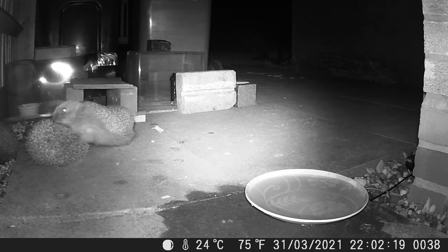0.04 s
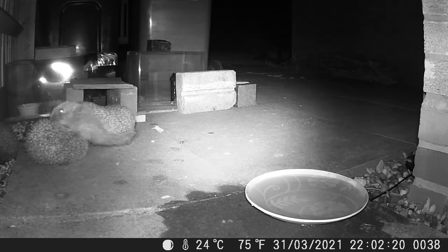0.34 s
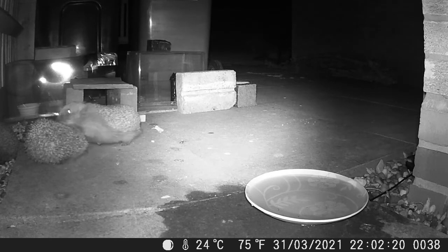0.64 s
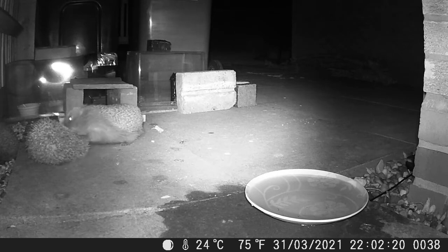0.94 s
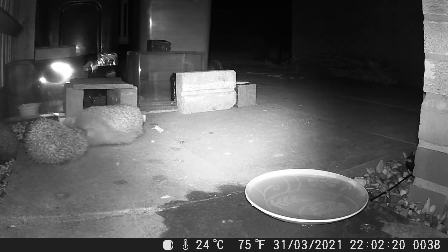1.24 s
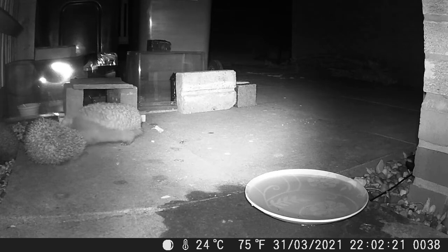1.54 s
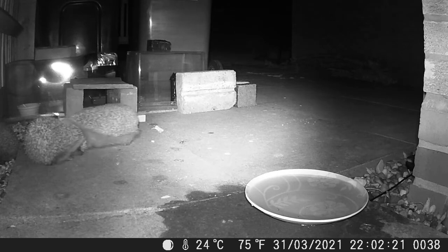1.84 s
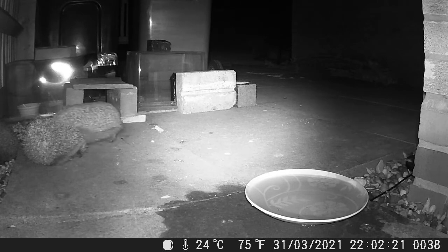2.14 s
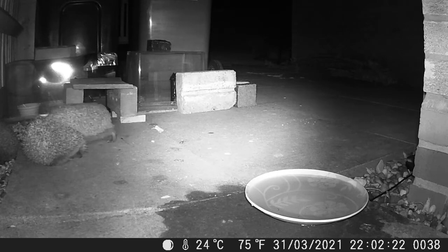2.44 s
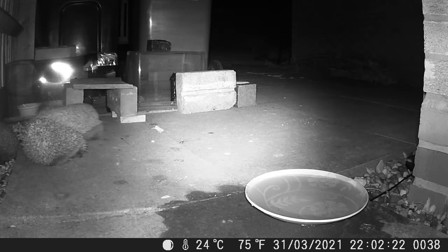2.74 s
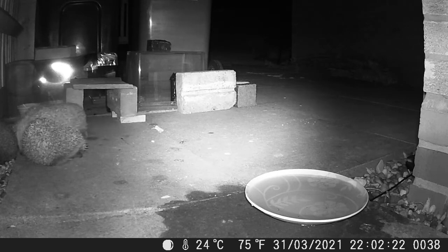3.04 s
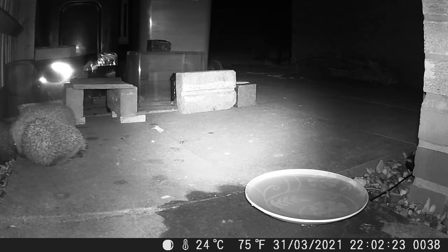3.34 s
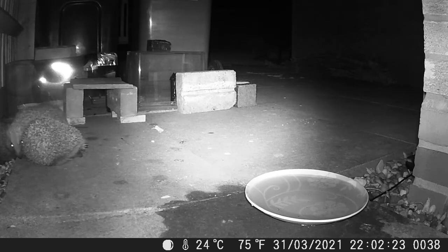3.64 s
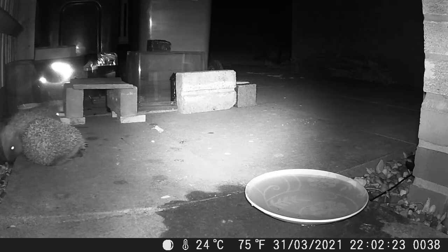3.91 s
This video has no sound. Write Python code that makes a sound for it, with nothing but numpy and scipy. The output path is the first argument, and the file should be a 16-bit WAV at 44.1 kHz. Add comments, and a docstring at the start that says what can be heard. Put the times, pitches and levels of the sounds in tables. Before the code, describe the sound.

Two hedgehogs sniff and huff faintly on a patio at night, with tiny dry ticks on the paving. The breaths come quickly, then thin out, over a low rumble, a wavering drone and hiss, a few metres from the microphone.

```python
"""Quick sniffs over a low rumble: two hedgehogs circle each other on a patio at night.
Short puffs of air ring in the nose of one, mixed with longer, fluttering huffs.
Dry ticks, likely claws and spines on the paving, fall among the breaths; both have a weak echo.
Behind them a hollow drone swells and fades, over a faint rustle and the soft hiss
of the night air and a trail camera a few metres away."""
import sys
import numpy as np
from scipy import signal
from scipy.fft import rfft, irfft
from scipy.io import wavfile
from scipy.ndimage import uniform_filter1d

SR = 44100
rng = np.random.default_rng(int(sys.argv[2]) if len(sys.argv) > 2 else 0)


def store_wav(level_fs):
    """Save 16-bit WAV to argv[1]."""
    pcm = np.round(np.clip(np.atleast_2d(level_fs), -1, 1) * 32767)
    wavfile.write(sys.argv[1], SR, pcm.T.astype(np.int16))


N = 176400
T = np.arange(N) / SR


# One row per sniff: peak t/s, relative level/dB, half length/s, open-nostril level/dB, pitch f/Hz
SNIFFS = [(0.172, -47, 0.0046, -10, 3500), (0.248, -48, 0.0035, -8, 3540), (.338, -43.5, 0.004, -1, 3470),
          (0.415, -42, 0.007, -2, 3480), (0.49, -42.5, 0.0048, 3, 3140), (0.5, -44, .003, 5, 3200),
          (.526, -51, 0.0047, 1, 3400), (0.586, -39, 0.0021, -6, 3170), (0.598, -47.5, 0.0094, 3, 3600),
          (0.648, -45, 0.0024, 3, 3120), (0.677, -38, 0.0023, -3, 3300), (0.697, -45, 0.0035, -12, 3550),
          (.81, -45, .0044, -8, 3020), (0.907, -40.5, 0.006, -16, 3300), (.92, -41.5, 0.0026, -15, 2950),
          (0.962, -42, 0.0046, -6, 3470), (.977, -41, 0.0059, 0, 2830), (.988, -37.5, 0.0033, -6, 3220),
          (1.014, -39, .0035, -9, 2820), (1.044, -32, 0.0047, -11, 3370), (1.143, -48, .005, 4, 3650),
          (1.34, -48, .004, -1, 3600), (1.416, -45.5, .006, 1, 3619), (1.455, -40, 0.005, -2, 3080),
          (1.685, -46, .006, -7, 2880), (1.723, -52, .004, -5, 3400), (1.778, -44, .005, -14, 3350),
          (1.844, -40.5, .0029, -10, 3470), (2.261, -40, 0.0047, -15, 3664),
          (2.287, -39, 0.0044, -18, 3509), (2.3, -37.5, 0.0039, -9, 3460),
          (2.787, -43.5, 0.0061, -10, 3350), (3.049, -47.5, 0.0038, -11, 3320),
          (3.784, -49, 0.0046, -10, 3550)]
# Where the nose rings in a sniff: multiple of the pitch, width/Hz, level/dB
SNIFF_NOSE = [(.86, 700, -7), (1, 380, 2), (1.09, 492, -10.5)]
# The lower rings of open nostrils: f/Hz, width/Hz, level/dB
SNIFF_OPEN = [(1290, 500, -8), (2030, 670, 4)]

def sniffs():
    """Each sniff is a tiny puff through the nose at its own pitch; wider nostrils add lower sound."""
    tail_db, tail_s = -13, 0.0068
    out = np.zeros(N)
    for peak, db, half, open_db, pitch in SNIFFS:
        near = np.abs(T - peak) < .08
        age = T[near] - peak
        rings = [(multiple * pitch, width, ring_db) for multiple, width, ring_db in SNIFF_NOSE]
        air = nose(rings, len(age)) + from_db(open_db) * nose(SNIFF_OPEN, len(age))
        puff = np.exp(-np.minimum((age / half) ** 2, 20))
        tail = (age > 0) * from_db(tail_db) * np.exp(-np.abs(age) / tail_s)
        out[near] += from_db(db - 7) * np.maximum(puff, tail) * air
    return out


# One row per huff: start t/s, rise/s, length/s, level/dB, relative open-nostril level/dB, swell/dB
HUFFS = [(0.612, 0.015, 0.085, -54.5, 5, 2), (0.929, 0.015, 0.12, -48, 1, 8),
         (1.401, 0.004, 0.073, -51.5, 6, -1), (1.637, 0.025, 0.16, -57, -5, 1.5),
         (2.201, 0.017, 0.095, -54, -1, 5), (2.744, 0.025, 0.042, -56.5, -6, 8),
         (3.732, 0.0091, 0.057, -54, -9, 1)]
# Where the nose rings in a huff: f/Hz, width/Hz, level/dB
HUFF_NOSE = [(2850, 700, -5.5), (3530, 460, 2)]
# The lower rings of open nostrils: f/Hz, width/Hz, level/dB
HUFF_OPEN = [(1110, 790, -0.5), (1900, 320, -5.5), (2470, 280, -1)]

def huffs():
    """A huff is a longer breath that usually swells, flutters in the nostrils and stops quickly."""
    release_s, flutter_db = 0.015, 2
    nasal, opened = nose(HUFF_NOSE), nose(HUFF_OPEN)
    out = 0
    for start, rise, length, db, open_db, swell_db in HUFFS:
        age = T - start
        flow = np.clip(age / rise, 0, 1) * np.exp(-np.maximum(age - length, 0) / release_s)
        push_db = swell_db * (np.clip(age / length, 0, 1) - 1)
        air = nasal + from_db(open_db - 6.5) * opened
        out += flow * from_db(db + push_db) * air
    return out * from_db(flutter_db * np.clip(drift(130), -2, 2))


# A faint, high fizz that the recorder adds to every breath: f/Hz, width/Hz, level/dB
RECORDER_FIZZ = [(5200, 850, -10.5), (6550, 430, -2)]

def nose(rings, size=N):
    """An even stream of air rings in the nose; the recorder adds a faint, high fizz."""
    air = cut_treble(ringing_noise(rings, size), hz=3880, order=8)
    loudness = np.sqrt(uniform_filter1d(air ** 2, size=260) + 1e-9)
    return air / loudness + from_db(-22) * ringing_noise(RECORDER_FIZZ, size)


# Dry ticks, likely claws and spines on paving: t/s, relative level/dB, body level against the top/dB
TICKS = [(.336, -38, -5), (.4115, -34, -1), (.488, -31.5, -4), (.524, -35.5, -2), (.5865, -29.5, -5),
         (.594, -38, 3), (.654, -30, 1), (0.677, -37, -5), (.697, -36, -8), (.987, -31, 1),
         (1.046, -39, -7), (1.1265, -40, 1), (1.2924, -31.5, -4), (1.4062, -33, 1.5), (1.414, -36, 4),
         (1.438, -36, -2), (1.4502, -27.5, -4), (1.841, -35, -8), (2.299, -42, 3), (3.046, -39, -8)]
# The lower body of a tick: f/Hz, width/Hz, level/dB
TICK_BODY = [(1200, 1300, -5), (2200, 662, 0.5)]
# The bright top of a tick: f/Hz, width/Hz, level/dB
TICK_TOP = [(3080, 450, -1), (3500, 560, -1)]

def ticks():
    """Each tick is one sharp touch and a tiny scrape that dies in a few milliseconds."""
    decay_s = 0.0021
    scrape = from_db(-22.5) * rng.standard_normal(N)
    top, body = 0, 0
    for start, db, body_db in TICKS:
        force = (T > start) * scrape * np.exp(-np.minimum(np.abs(T - start) / decay_s, 20))
        force[int(start * SR)] = 1  # the first touch
        top += from_db(db) * force
        body += from_db(db + body_db) * force
    ringing = struck(body, TICK_BODY) + struck(top, TICK_TOP)
    return from_db(23) * cut_treble(ringing, hz=4300, order=6)


def patio_echo(sound, delay_s=0.019, echo_db=-18):
    """The sound bounces off nearby boxes and a wall, adding one weak, quick echo."""
    return sound + from_db(echo_db) * np.interp(T - delay_s, T, sound, left=0)


# How the drone moves: t/s, level/dB, pitch f/Hz
DRONE_PATH = [(0, -59, 227.3), (0.171, -34, 226.3), (.25, -50, 219.8), (.35, -31, 216.7), (.46, -45, 220.3),
              (.58, -37.5, 228), (.68, -49, 224), (1.07, -35.5, 216.8), (1.14, -45, 220),
              (1.301, -33, 226.2), (1.42, -45, 225.2), (1.55, -32.5, 222.2), (1.691, -54, 225),
              (2.02, -49, 227.7), (2.17, -37, 225.7), (2.46, -35, 225.7), (2.59, -28.5, 227.4),
              (2.7, -45.5, 229.2), (2.8, -48, 228.1), (2.88, -36, 226.9), (3.03, -32, 224), (3.2, -50, 222),
              (3.35, -41.5, 227), (3.45, -32.5, 229), (3.521, -43, 228.9), (3.58, -32, 231),
              (3.68, -42, 226.8), (3.87, -39, 223), (4, -56, 227)]
# A hollow rush that swells with it: f/Hz, width/Hz, level/dB
DRONE_RUSH = [(189.5, 21, 1.5), (293, 12, -11), (345, 50, -10.5)]

def drone():
    """A hollow, wavering tone swells, fades and wanders a little in pitch."""
    times, db, hz = np.transpose(DRONE_PATH)
    base_hz, width_hz = 229.7, 10.5
    tone = signal.hilbert(ringing_noise([(base_hz, width_hz, 0)]))
    evened = tone / (np.abs(tone) + 0.089)  # irons out most of the random swings in loudness
    bend = np.exp(2j * np.pi * np.cumsum(np.interp(T, times, hz) - base_hz) / SR)
    hum = rms_one((evened * bend).real)  # the tone, slid to the pitch in the table
    rush = from_db(-7.5) * ringing_noise(DRONE_RUSH)
    return (hum + rush) * from_db(np.interp(T, times, db))


# How loud the rustle is: t/s, level/dB
RUSTLE_LEVEL = [(0, -52.5), (.85, -55.5), (1.0, -53), (1.15, -56.5), (1.38, -54), (1.43, -53), (1.52, -54),
                (1.95, -55), (2.25, -52), (2.6, -54), (3.2, -54), (3.37, -50), (3.48, -63), (3.9, -52)]
# The pitches it gathers around: f/Hz, width/Hz, level/dB
RUSTLE_BANDS = [(670, 420, 1), (1078, 410, 1.5), (1830, 660, -5.5)]

def rustle():
    """A faint rustle, neither deep nor high, comes and goes under the hiss."""
    times, db = np.transpose(RUSTLE_LEVEL)
    return from_db(np.interp(T, times, db)) * ringing_noise(RUSTLE_BANDS)


# The rumble's strength from low to high: f/Hz, relative level/dB
RUMBLE_SHAPE = [(12, -3.5), (27, 4.5), (38, 0.5), (55, 1.5), (78, -2), (108, -3), (130, -3), (165, -16.5),
                (205, -15), (270, -17), (345, -15), (400, -23.5), (600, -72)]
# Hollow rings in the rumble: f/Hz, width/Hz, level/dB
HOLLOW_RINGS = [(48.6, 12.4, 5.5), (114.9, 24.7, -0.5), (151.7, 8.1, 0.5), (189.7, 21.7, -1),
                (216.7, 18.2, -1), (253.9, 8.1, -4.5), (290.8, 8.3, -4.5)]

def rumble():
    """Deep, steady noise with a few hollow rings in it."""
    return from_db(-32) * shaped_noise(RUMBLE_SHAPE) + from_db(-35) * ringing_noise(HOLLOW_RINGS)


# The hiss's strength from low to high: f/Hz, relative level/dB
HISS_SHAPE = [(150, -0.5), (450, 2.5), (750, -2), (1200, -6.5), (2000, -10.5), (2800, -14.5), (3400, -17.5),
              (3750, -18.5), (4100, -27), (4600, -30.5), (5200, -32), (6000, -26.5), (6700, -23),
              (7150, -25.5), (7600, -42), (9000, -41.5), (10200, -50.5), (11200, -68)]

def hiss():
    """The night air and the camera make a smooth hiss that wavers very slightly."""
    return from_db(-44.5 + 0.5 * drift(2.3)) * shaped_noise(HISS_SHAPE)


def from_db(db):
    """Turn decibels into a number to multiply a sound by."""
    return 10 ** (np.asarray(db) / 20)


def rms_one(sound):
    """Scale a sound so that its average strength (rms) is 1."""
    return sound / np.sqrt(np.mean(sound ** 2) + 1e-20)


def drift(rate_hz):
    """A smooth random wobble of strength 1; a higher rate wobbles faster."""
    step, warm_up = 40, 2000
    r = np.exp(-2 * np.pi * step * rate_hz / SR)
    noise = rng.standard_normal(N // step + warm_up + 2)
    slow = signal.lfilter([1], [1, -2 * r, r * r], noise)[warm_up:]
    return np.interp(np.arange(N) / step, np.arange(len(slow)), rms_one(slow))


def shaped_noise(shape):
    """Steady noise of strength 1 with the given balance of low and high."""
    hz, db = np.transpose(shape)
    f = np.maximum(np.arange(N // 2 + 1) * SR / N, 1)
    gain = from_db(np.interp(np.log(f), np.log(hz), db))
    return rms_one(irfft(rfft(rng.standard_normal(N)) * gain, N))


def ringing_noise(rings, size=N):
    """Noise of strength 1 gathered around a few pitches; a narrower ring is more like a tone."""
    out = 0
    for hz, width, db in rings:
        r = np.exp(-np.pi * width * np.sqrt(2) / SR)
        gain = (1 - r * r) / 2
        band = [gain, 0, -gain, 1, -2 * r * np.cos(2 * np.pi * hz / SR), r * r]
        noise = rng.standard_normal(size + SR)  # one extra second lets the ring build up
        out += from_db(db) * signal.sosfilt([band, band], noise)[SR:]
    return rms_one(out)


def struck(force, rings):
    """A knock sets several pitches ringing at once, every second one flipped upside down."""
    out = 0
    for k, (hz, width, db) in enumerate(rings):
        r = np.exp(-np.pi * width / SR)
        feedback = [1, -2 * r * np.cos(2 * np.pi * hz / SR), r * r]
        ring = (1 - r * r) / 2 * signal.lfilter([1, 0, -1], feedback, force + 1e-18)
        out += (-1) ** k * from_db(db) * ring
    return out


def cut_treble(sound, hz, order):
    """Turn down everything above hz; a higher order cuts more sharply."""
    return signal.sosfilt(signal.butter(order, hz, fs=SR, output="sos"), sound)


def scene():
    """The hedgehogs over the night background, in one channel."""
    hedgehogs = patio_echo(sniffs() + huffs() + ticks())
    return (hedgehogs + rustle() + drone() + rumble() + hiss())[None]


def record(dry):
    """The sound fades in and out very quickly, and the camera cuts the highest treble."""
    fade_s, cutoff_hz = .008, 10600
    fade = np.clip(np.minimum(T, T[-1] - T) / fade_s, 0, 1)
    return signal.sosfilt(signal.ellip(10, .1, 80, cutoff_hz, fs=SR, output="sos"), dry * fade)


dry = scene()
out = record(dry)
store_wav(out)
```